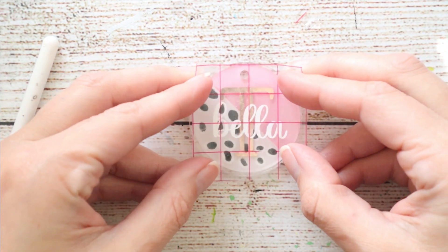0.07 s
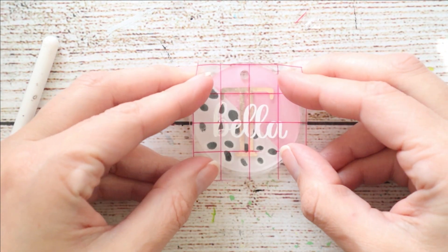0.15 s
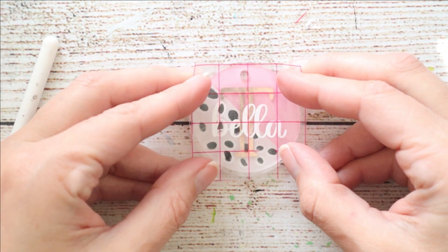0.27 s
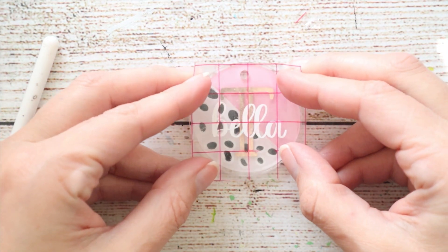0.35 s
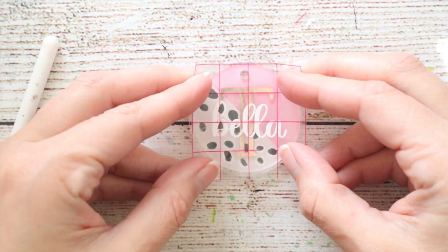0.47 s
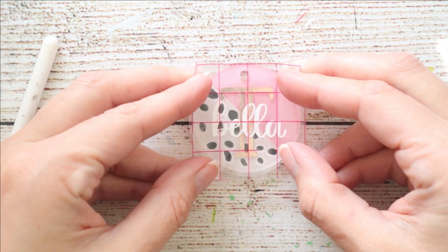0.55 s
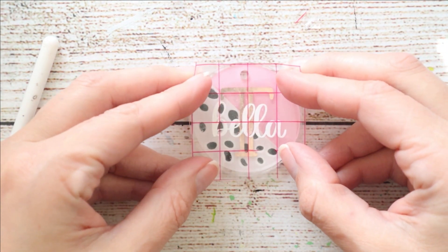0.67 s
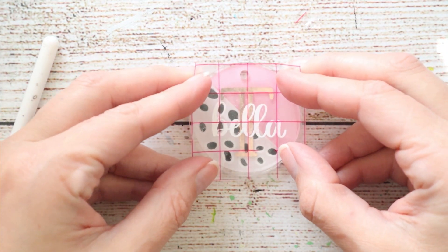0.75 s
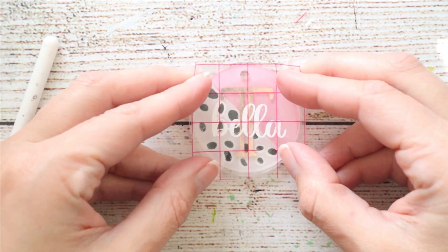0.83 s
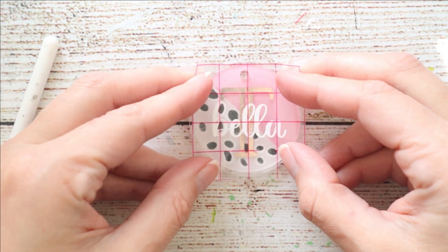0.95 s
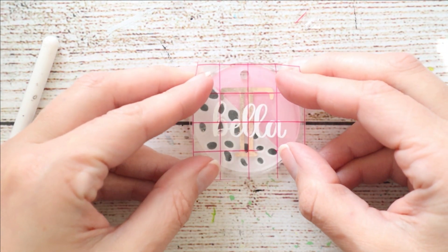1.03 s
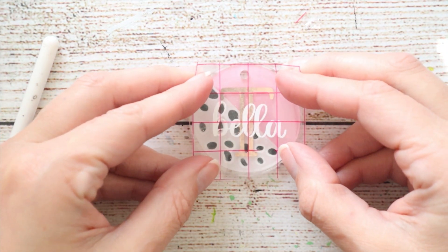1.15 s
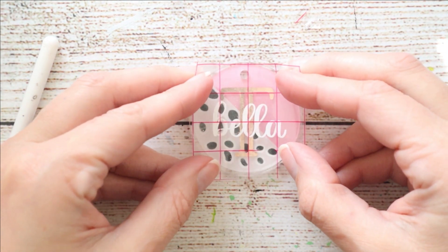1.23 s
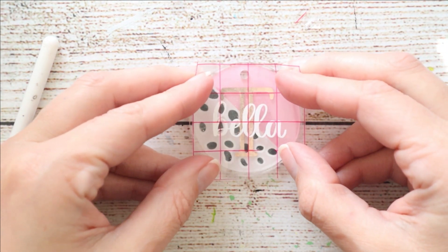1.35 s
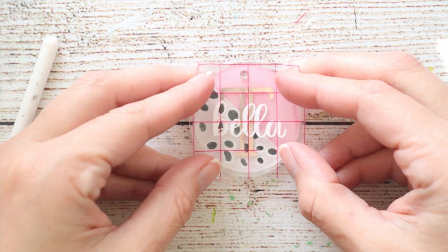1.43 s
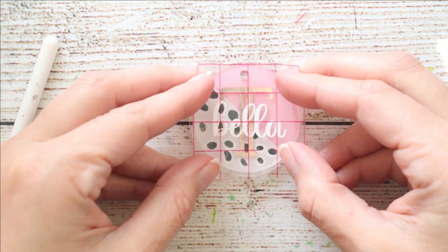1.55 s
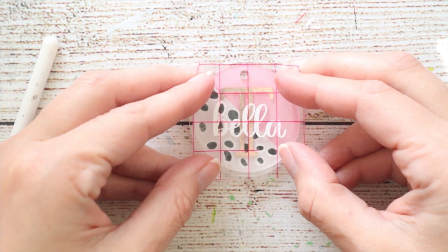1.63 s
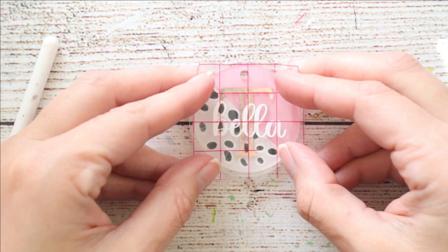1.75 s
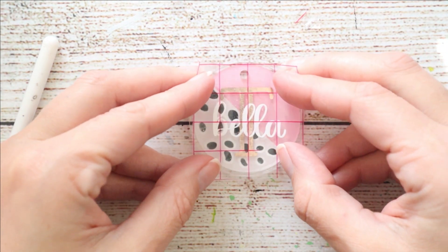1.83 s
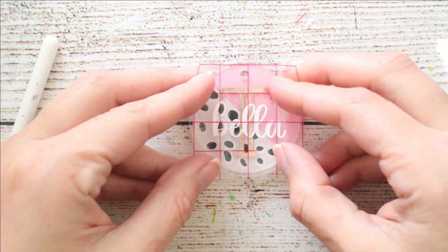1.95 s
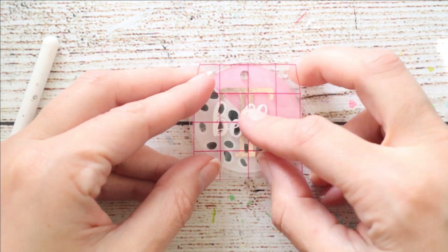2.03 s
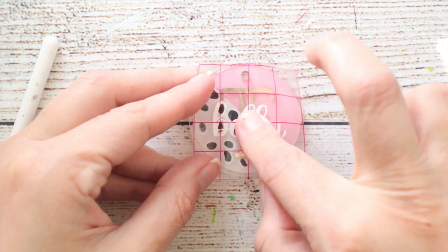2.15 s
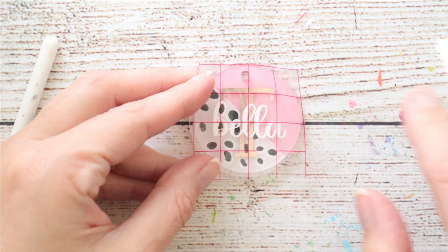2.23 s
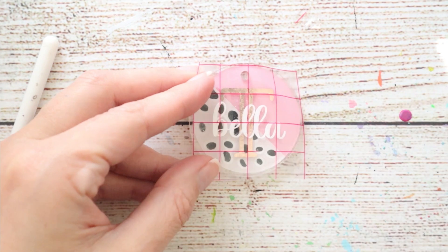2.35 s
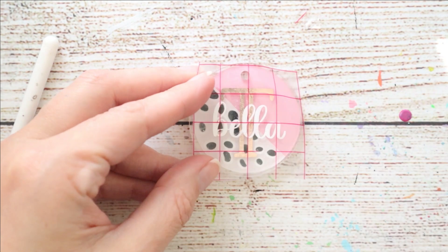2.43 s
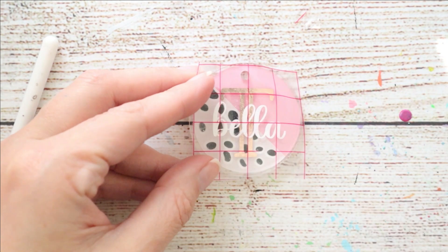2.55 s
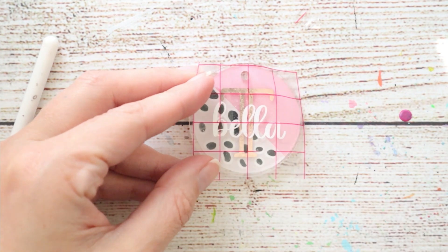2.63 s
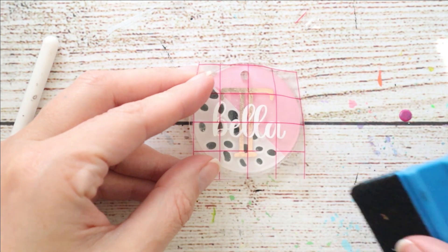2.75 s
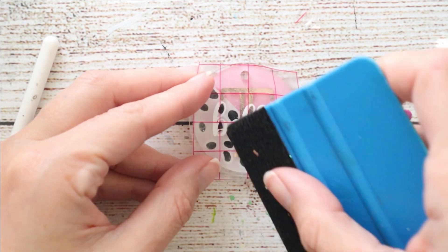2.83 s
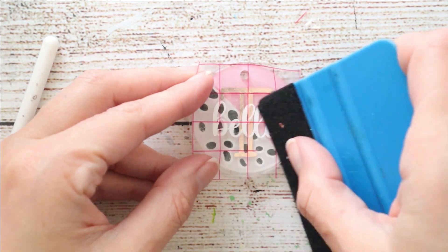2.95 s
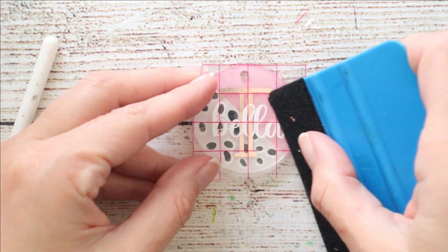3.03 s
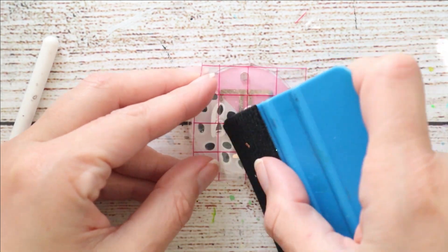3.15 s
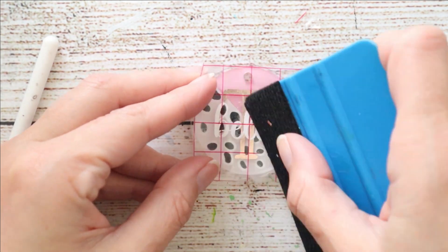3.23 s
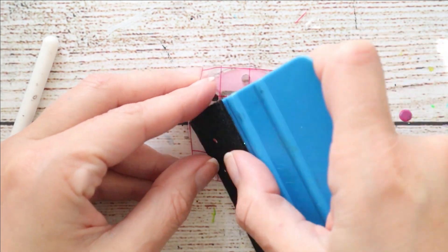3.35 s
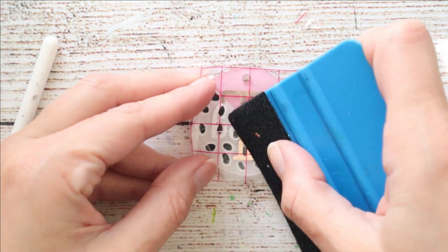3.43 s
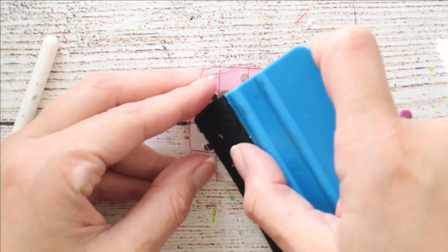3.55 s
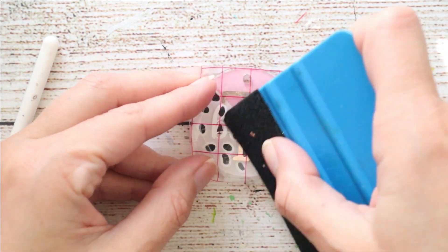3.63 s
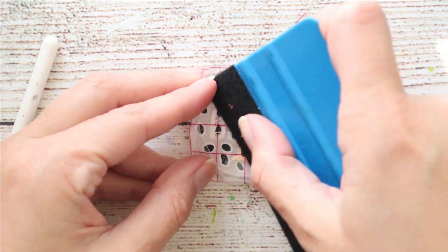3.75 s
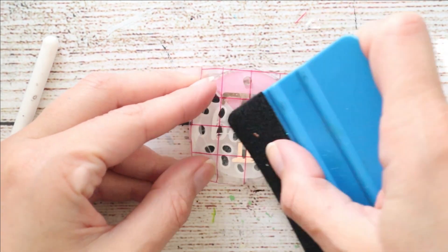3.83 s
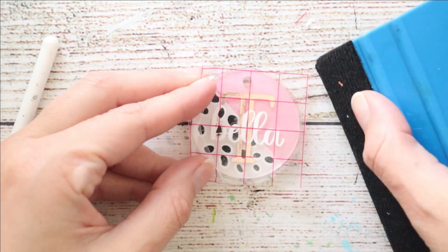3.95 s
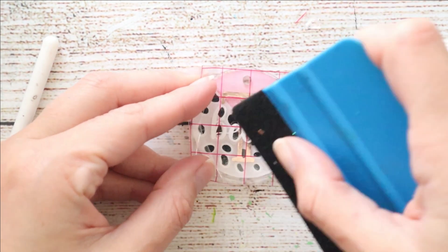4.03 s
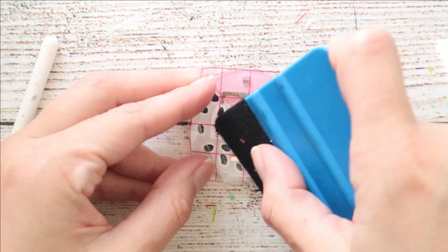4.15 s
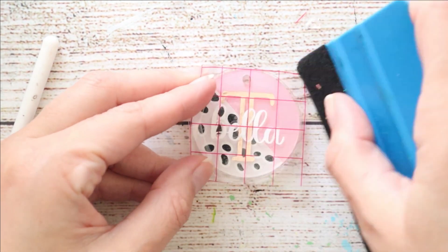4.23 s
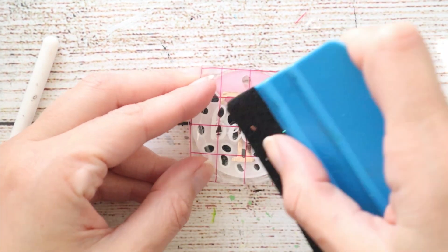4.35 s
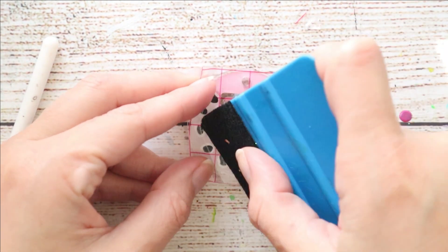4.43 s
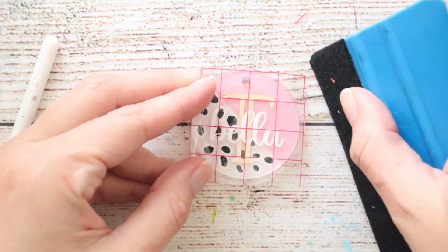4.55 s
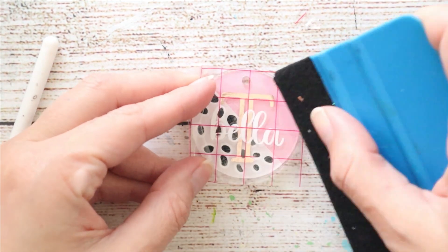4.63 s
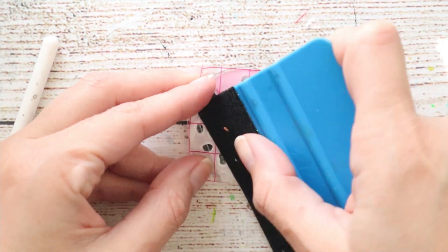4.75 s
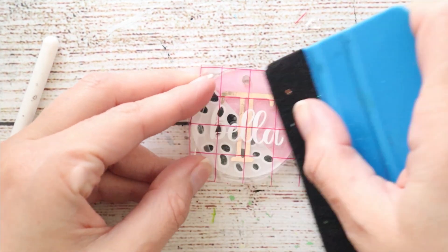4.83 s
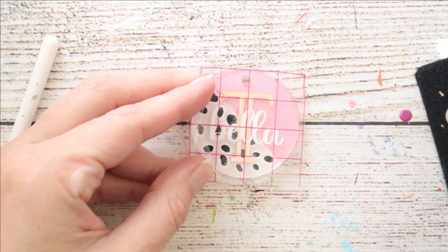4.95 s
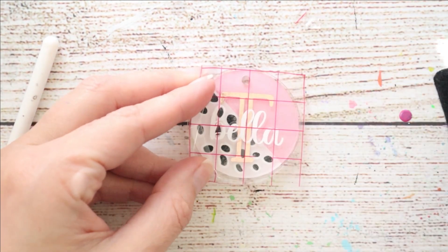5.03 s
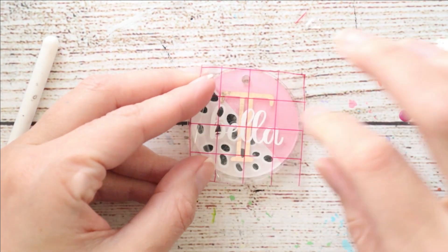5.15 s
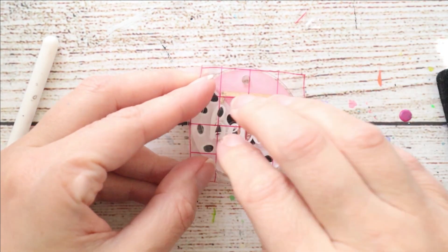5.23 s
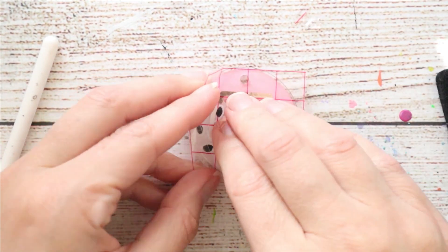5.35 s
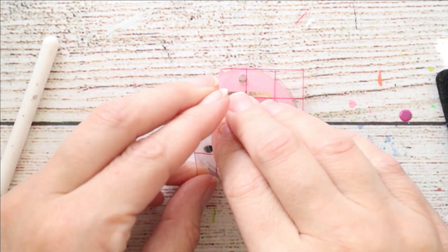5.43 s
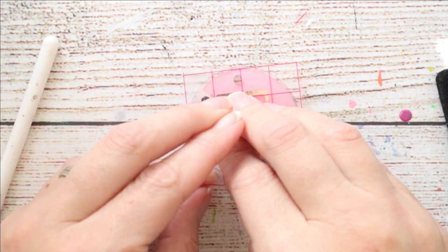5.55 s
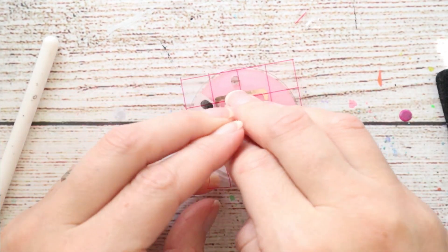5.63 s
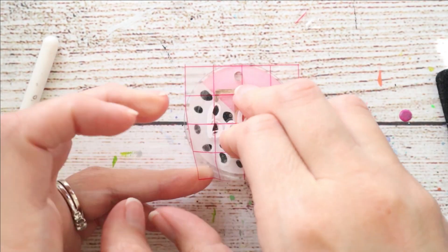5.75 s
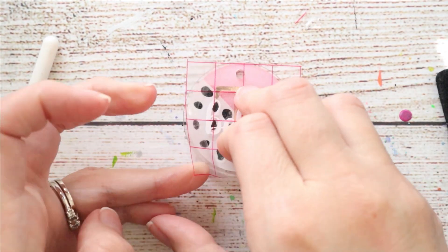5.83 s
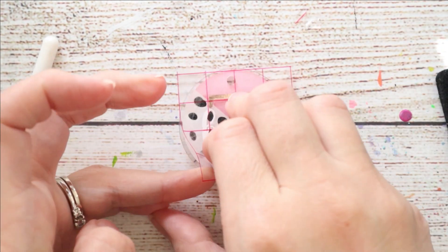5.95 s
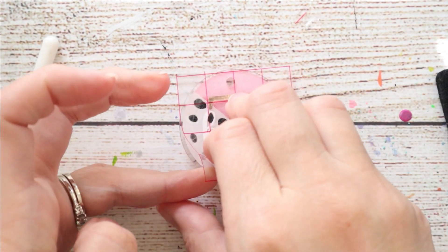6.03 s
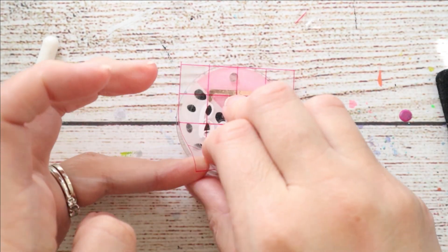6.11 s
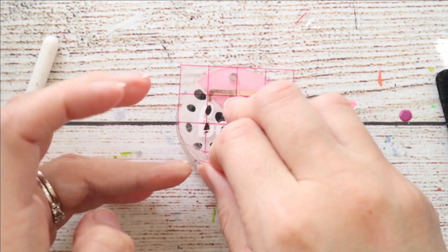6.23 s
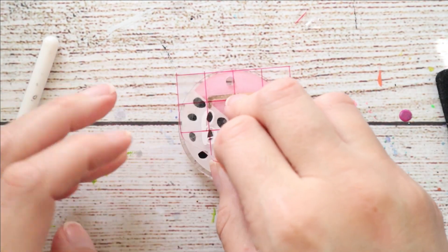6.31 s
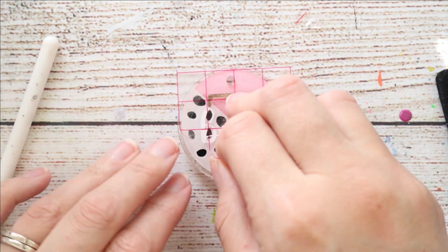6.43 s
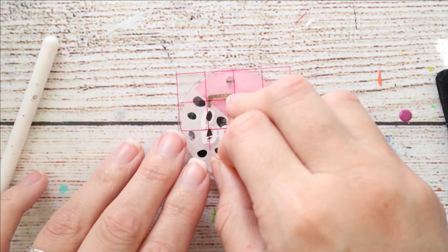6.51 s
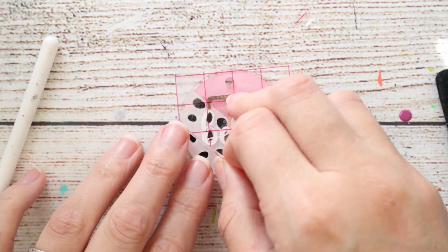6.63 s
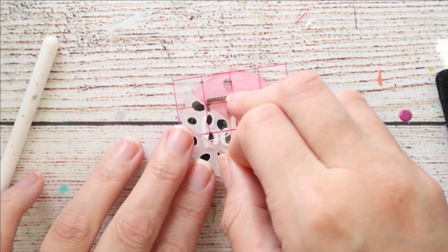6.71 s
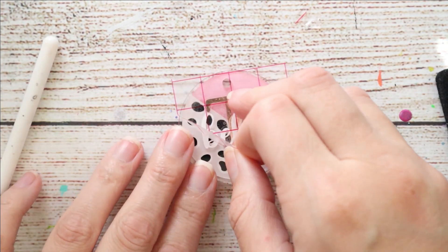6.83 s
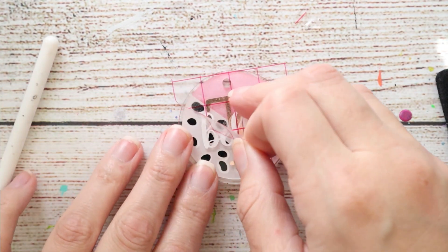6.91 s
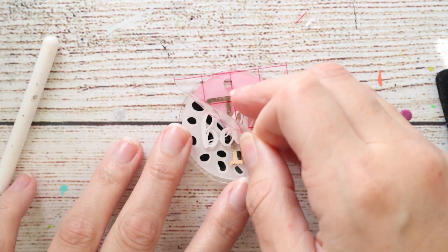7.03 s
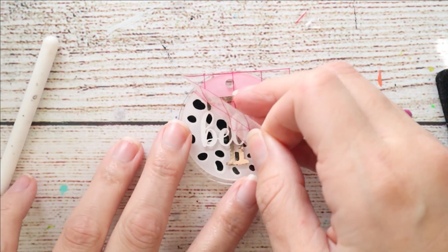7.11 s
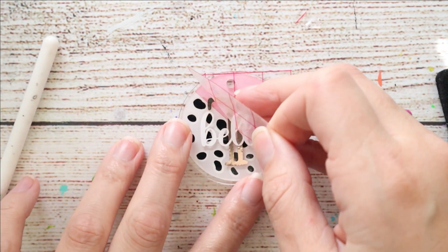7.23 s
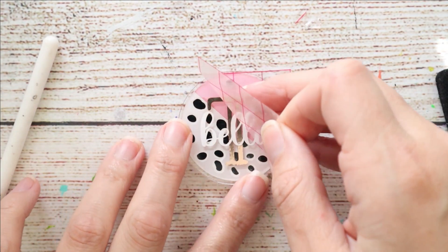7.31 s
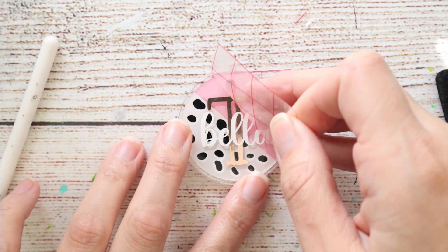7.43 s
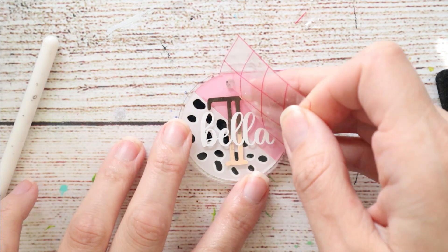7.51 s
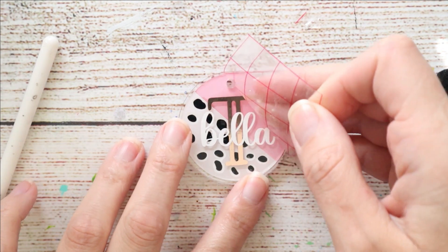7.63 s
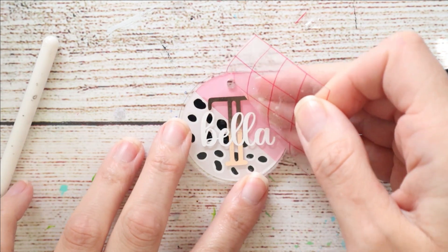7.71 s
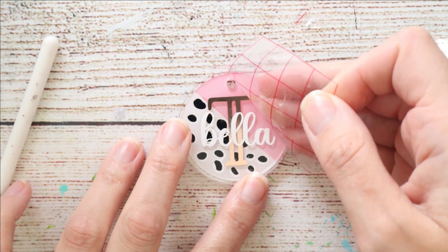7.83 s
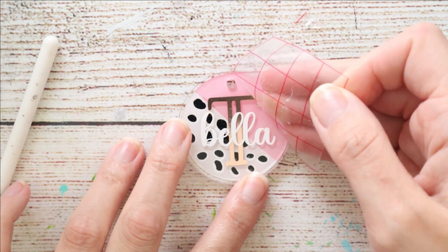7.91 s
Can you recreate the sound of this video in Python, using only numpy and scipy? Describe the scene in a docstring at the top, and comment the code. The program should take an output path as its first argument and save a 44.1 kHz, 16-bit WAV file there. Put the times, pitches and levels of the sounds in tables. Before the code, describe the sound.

A close stereo microphone in a small, quiet room picks up soft, steady, low air. Nothing else happens until about 2.0 s, when faint film ticks and a short scrape lead to a sharp, ringing snap at 2.2 s. Light disc bumps and scuffs follow, with a firmer thud near 2.5 s and a dull boom at 3.0 s. From 3.0 to 4.0 s felt rubs steadily over tape, hissy and grainy above a low drag, with small clicks. Between 4.2 and 5.4 s come the loudest hollow plastic-on-wood clacks, in an uneven run with brief scrapes. Around 5.4 to 6.0 s only small ticks and soft hand movement remain. At 6.1 s the disc gives a short stuttering judder; at 6.3 s a bright snap. From 6.7 s to the end, quiet fine crackling swells and dips as tape peels off, its bright rustle gliding slightly upward, then falling.

```python
"""Transfer tape is rubbed onto an acrylic disc with a felt-edged squeegee, then peeled off, heard close up.
Felt and fingers scrape (coloured random grains), and the disc clacks on a hollow craft table (dying modes).
The tape snaps (short ringing bursts), the pressed disc judders once along the table (stick and slip),
and the glue lets go in a fine crackle (random grains). A small, quiet room adds its echo and steady air."""
import sys
import numpy as np
from scipy import signal
from scipy.fft import rfft, irfft, next_fast_len
from scipy.io import wavfile
from scipy.ndimage import uniform_filter1d, map_coordinates

SR = 44100
rng = np.random.default_rng(int(sys.argv[2]) if len(sys.argv) > 2 else 0)


def waveform_to_disk(signal):
    """Save audio, clipped to [-1, 1], as 16-bit WAV at the path in sys.argv[1]."""
    frames = np.transpose(np.atleast_2d(signal))
    scaled = np.clip(frames, -1, 1) * 32767
    samples = np.round(scaled).astype(np.int16)
    wavfile.write(sys.argv[1], SR, samples)


N = 351473
TIME = np.arange(N) / SR
AGE = np.arange(SR // 3) / SR  # seconds since a blow
BLOW_S = 0.02  # a blow's level is its energy spread over this time
EDGE_HZ = 16300  # upper limit of the sound
ATTACK_S, RELEASE_DB_PER_S = 0.029, 185  # how strokes and shifting hands start and stop

# blows of the disc on the table: start_s, strength_db, hardness_db (clack over boom),
# weight_db (thud over boom), clack_hz (centre of the clack), tick_db (contact tick), tilt_db_per_octave (boom)
KNOCKS = [(2.1204, -36, -14, -5, 1500, -40.5, 1), (2.232, -35.5, 3.5, 0, 1580, -42, 2),
          (2.5, -36, -2.5, 2.5, 1790, -54, 0), (2.517, -25, -8, -3, 1460, -66, 0),
          (2.595, -39.5, -10, -6, 1800, -50, 1), (2.82, -45, -15.5, 1, 1400, -75, 6),
          (3.0035, -24.5, -17, -8, 1190, -67, -5.5), (3.182, -46.5, 2.5, 6, 2090, -56, -3),
          (3.3715, -49, 7, 2, 2010, -62, 7), (3.4211, -46.5, 3, 5.5, 2000, -57, -1),
          (3.632, -40, -16, -5, 1100, -72, 4), (3.661, -52, 3.5, 0, 2430, -69, -1.5),
          (3.731, -42.5, -27, 1.5, 1700, -66, -8), (3.837, -41.5, -20, 7, 1900, -51.5, -3.5),
          (3.869, -45, -4, 8, 2100, -60, -10), (4.028, -30, -18.5, -1.5, 1900, -37.5, -4.5),
          (4.218, -16.5, -2.5, -14, 1600, -49, 3.5), (4.329, -17.5, -12, -1.5, 1160, -30.5, -0.5),
          (4.509, -17, 1, -13, 1820, -16.5, 9), (4.6315, -22.5, -6, -2, 1730, -37.5, 2),
          (4.827, -22, 1, -6, 1680, -23.5, -2.5), (4.9472, -20.5, -6, -2, 1450, -30, 0.5),
          (5.2069, -18.5, 4, -11.5, 2950, -31.5, -5.5), (5.267, -30.5, -6.5, -22, 2480, -66, 1),
          (5.2768, -24, -19, -14, 1270, -63, 2), (5.3249, -36, -7.5, -22, 2500, -70, -5),
          (5.3695, -32, -8.5, -17, 1400, -65, -4), (5.7382, -35, -8.5, -8.5, 1600, -72, 1),
          (6.313, -42.5, -16, 7.5, 1900, -60, -7)]
# snaps of the tape: start_s, crack_db, ring_hz, brightness_db (fizz over crack)
SNAPS = [(2.0053, -57, 3870, -2), (2.063, -57.5, 4500, 1), (2.1205, -41.5, 2660, 5), (2.1765, -43, 7000, 9),
         (2.1796, -37, 4780, 0), (2.185, -36, 4470, 1), (2.2157, -43.5, 5000, 9), (2.2328, -20.5, 4140, -3),
         (3.1056, -37.5, 2900, -12), (3.182, -38, 3000, -9), (3.273, -44, 4800, -8),
         (3.2803, -39.5, 6260, 1), (3.2825, -32.5, 6340, 1.5), (3.3715, -38, 2900, -13),
         (3.385, -44, 4200, -6), (3.4214, -33, 3530, -22), (3.43, -46, 5500, -1), (3.6617, -44, 3750, -27),
         (3.739, -48, 3160, -9), (3.863, -46, 4000, -19), (3.8676, -35.5, 3030, -13),
         (3.9386, -47, 7000, 14), (4.0, -44, 1970, -21), (4.043, -54, 5050, 3), (4.51, -34.5, 4600, 11),
         (4.832, -38, 1820, 12.5), (5.226, -34, 7140, -4), (5.36, -40.5, 5140, -12), (5.37, -36, 6640, -14),
         (5.4493, -37, 5830, -0.5), (5.5541, -50, 4500, -7), (5.5999, -47.5, 3500, -1.5),
         (6.3135, -20.5, 4800, -4), (6.806, -46.5, 5930, 0), (7.5194, -48.5, 6900, -6),
         (7.7945, -53.5, 5860, -15), (7.838, -59, 6000, -15), (7.877, -53, 5630, -18)]
# colour of felt hissing on tape, also of the taut span: pitch_hz, level_db (relative, per Hz)
HISS = [(1500, -36.5), (3200, -2), (5000, 1), (7000, -0.5), (9000, -2), (12000, 2), (13500, -11.5),
        (15500, -35)]
# colour of low rumble through the table: pitch_hz, level_db (relative, per Hz)
DRAG = [(25, -18.5), (60, -3), (120, 1.5), (180, -7), (280, 2.5), (450, -13.5), (650, -13.5), (1200, -28),
        (3000, -41)]
# how alike left and right are for near sounds: pitch_hz, likeness (-1 opposite to 1 the same)
NEAR = [(100, 1), (300, 1), (600, 0.85), (1100, 0.37), (2200, 0.58), (5000, -0.14), (8000, 0.18),
        (12000, -0.36)]
# how alike left and right are for the room: pitch_hz, likeness (-1 opposite to 1 the same)
FAR = [(60, 1), (130, 0.49), (280, 0.02), (600, -0.31), (1300, -0.47), (6000, -0.68), (13000, -0.76)]


def amp(db):
    """Turns decibels into a gain."""
    return 10 ** (np.asarray(db) / 20)


def evened(x):
    """Scales a sound to an rms of one."""
    return x / np.sqrt(np.mean(x ** 2) + 1e-20)


def sized(x, db):
    """Scales a short stereo sound to a blow's level."""
    return amp(db) * x / np.sqrt(np.sum(x ** 2) / (2 * BLOW_S * SR) + 1e-20)


def read(points, hz):
    """Reads a table between its points, on a log-frequency axis."""
    f, value = np.transpose(points)
    return np.interp(np.log(hz + 1), np.log(f + 1), value)


def add(mix, s, sound):
    """Adds a stereo sound at time s, cut off at the end of the mix."""
    part = mix[:, round(s * SR):][:, :sound.shape[1]]
    part += sound[:, :part.shape[1]]


def colour(x, shape, likeness, ring_hz=1000., ring_db=0., ring_octaves=0.88):
    """Filters two unrelated signals to a colour, with one optional resonance, and blends them into stereo."""
    n = next_fast_len(x.shape[1] + 2048)
    hz = abs(np.fft.fftfreq(n, 1 / SR))
    db = read(shape, hz) + ring_db / (1 + (np.log2((hz + 1) / ring_hz) / ring_octaves) ** 2)
    db -= 18 * np.log2(np.maximum(hz / shape[-1][0], 1))  # the treble keeps falling past the last point
    # minimum phase: the filter never sounds before its input
    response = np.exp(np.conj(signal.hilbert(np.log(amp(db)))))[:n // 2 + 1]
    same = np.clip(read(likeness, hz[:n // 2 + 1]), -1, 1)
    mid, side = rfft(x, n) * response * np.sqrt([1 + same, 1 - same])
    return irfft(np.array([mid + side, mid - side]), n)[:, :x.shape[1]]


def burst(decay_s, rise_s=.0001, first=0.):
    """A brief chatter of micro-contacts, led by one sharp break of relative size first."""
    chatter = rng.standard_normal((2, len(AGE))) * np.exp(-AGE / decay_s)
    chatter *= 1 - np.exp(-AGE / rise_s)
    sign = np.sign(chatter[:, 1:2])
    return chatter + first * np.linalg.norm(chatter[0]) * sign * (AGE == 0)


def ring(modes, detune=.03, uneven_db=1.0, centre_hz=1000., focus_db=0.):
    """Dying modes, weaker by focus_db for each octave from centre_hz; weight and pitch vary with each blow."""
    hz, db, t60 = np.transpose(modes)[:, :, None]
    pitch, weight, polarity, lead = rng.standard_normal((4, len(hz), 1))
    mode_db = db + uneven_db * weight - focus_db * abs(np.log2(hz / centre_hz))
    gain = amp(mode_db - 60 * AGE / t60) * np.sign(polarity)
    turn = 2 * np.pi * hz * (1 + detune * pitch) * AGE
    # half the phase between left and right
    apart = np.sign(lead) * np.arccos(np.clip(read(NEAR, hz), -1, 1)) / 2
    stereo = np.array([(gain * np.sin(turn + k * apart)).sum(0) for k in (1, -1)])
    return stereo * (1 - np.exp(-AGE / 0.00056))


def gesture(start, length, swell_db, attack_s, release_db_per_s):
    """Gain of one movement: attack, a hold that swells or sags, release."""
    t = np.maximum(TIME - start, 0)
    swell = swell_db * (np.minimum(t / length, 1) - .5)
    release = release_db_per_s * np.maximum(t - length, 0)
    return np.minimum(t / attack_s, 1) * amp(swell - release)


def grains(per_s, spread_db, clump_db, clump_s):
    """Tiny slips or breaks of uneven size, arriving in clumps."""
    size = amp(spread_db * np.minimum(rng.exponential(1, N), 5))
    size *= rng.random(N) < per_s / SR
    clumps = np.interp(TIME / clump_s, np.arange(N), rng.standard_normal(N))
    return size * amp(clump_db * clumps) * rng.standard_normal((2, N))


def wandering(x, depth_db, patch_s, patch_hz):
    """The colour shifts in patches of time and pitch as the contact moves over the film."""
    hz, t, z = signal.stft(x, SR, nperseg=256)
    places = np.meshgrid(hz / patch_hz, t / patch_s, indexing="ij")
    shifts = map_coordinates(rng.standard_normal((len(hz), len(t))), places, order=1)
    return signal.istft(z * evened(amp(depth_db * shifts)), SR, nperseg=256)[1][:, :N]


def film(x):
    """The stiff tape adds its own resonances to whatever shakes it."""
    # what the film rings with: pitch_hz, width_hz, level_db (over the plain sound)
    film_rings = [(3635, 220, -1), (4650, 2700, -6), (5810, 190, -14), (6700, 1200, -11), (7750, 490, -10),
                  (10200, 490, -5), (11500, 310, -10)]
    ringing = 0
    for hz, width, db in film_rings:
        ringing = ringing + amp(db) * signal.lfilter(*signal.iirpeak(hz, hz / width, SR), x)
    return x + ringing


def board(db, tilt_db=0., dull_db=-5.0, dull_s=0.0066):
    """The table top's modes, tilted upward by tilt_db an octave, with the dull push of the blow itself."""
    # the table top: pitch_hz, level_db (relative), t60_s (time to die by 60 dB)
    board_modes = [(197, -13.5, 0.21), (240.4, -1, 0.15), (305.4, 1.5, 0.092), (337, 0.5, 0.073),
                   (388.6, -7.5, 0.1), (568, -2.5, 0.062), (675, -2.5, 0.029), (830, -11.5, 0.01)]
    # colour of the push: pitch_hz, level_db (relative, per Hz)
    push_colour = [(30, -21), (90, -13.5), (280, 5.5), (480, -17), (700, -6), (1200, -16.5), (3000, -42)]
    push = colour(burst(dull_s), push_colour, NEAR)
    modes = ring(board_modes, detune=0.022, centre_hz=board_modes[-1][0], focus_db=tilt_db)
    return sized(sized(modes, 0) + sized(push, dull_db), db)


def air():
    """Steady room tone: coloured noise, wide above the bass."""
    # colour of the tone: pitch_hz, level_db (relative, per Hz)
    air_colour = [(12, -37.5), (20, -2.5), (22, 1.5), (43, -1), (80, 0.5), (102, -2.5), (272, -2),
                  (329, -5.5), (420, -7.5), (567, -9.5), (977, -12.5), (1350, -15), (3230, -23),
                  (12200, -40.5), (13300, -58)]
    hz, db = np.transpose(air_colour)
    width_db = -10 * np.log10(np.clip(1 + read(FAR, hz), .1, 2))  # makes up for what a mono mix cancels
    shape = [*zip(hz, db + width_db), (EDGE_HZ, -75)]
    tone = colour(rng.standard_normal((2, N)), shape, FAR)
    return amp(-53) * tone / tone.mean(0).std()  # dB, of left and right averaged


def dying(times, db, db_per_s):
    """A gain that jumps at each event and fades steadily."""
    jumps = np.bincount(np.round(times * SR).astype(int), amp(db), minlength=N)[:N]
    return signal.lfilter([1], [1, -amp(-db_per_s / SR)], jumps)


def friction():
    """Gains of hiss, rasp and drag: strokes, the disc sliding on after a knock, film settling after a snap."""
    # strokes of felt or a fingertip, levels before the trims in sliding():
    # start_s, length_s, hiss_db, rasp_db, drag_db (on the table), swell_db (from start to end)
    strokes = [(1.982, 0.2, -53, -58.5, -62, 26), (2.356, .06, -55, -51, -43, -14),
               (2.483, 0.11, -52, -52.5, -51, 24.5), (2.651, .13, -50.5, -53, -46, 3.5),
               (3.021, 1, -52, -52.5, -46.5, -2.5), (4.259, 0.057, -44, -43.5, -40, 5),
               (4.863, 0.1, -50, -49.5, -46, 3), (4.935, 0.15, -44.5, -45.5, -40.5, -14),
               (5.284, 0.071, -66, -46, -33.5, -4.5), (5.405, 0.13, -51.5, -54.5, -63, 6),
               (5.744, 0.14, -61.5, -61, -64, -2.5), (5.955, .11, -63, -65.5, -54.5, 2),
               (6.094, 0.1, -50, -57, -62, -6.5), (6.228, 0.1, -54, -57, -49, -7)]
    settle_db, settle_db_per_s = -30, 47  # snapped film rustles, against its crack
    shift_rasp_db, shift_drag_db, shift_db_per_s = -27.5, -19, 93  # sliding on, against clack and boom
    knock_s, knock_db, hard_db = np.transpose(KNOCKS)[:3]
    snap_s, snap_db = np.transpose(SNAPS)[:2]
    settle = dying(snap_s, snap_db + settle_db, settle_db_per_s)
    shift_rasp = dying(knock_s, knock_db + hard_db + shift_rasp_db, shift_db_per_s)
    shift_drag = dying(knock_s, knock_db + shift_drag_db, shift_db_per_s)
    power = np.array([settle, shift_rasp, shift_drag]) ** 2
    for start, length, *layers_db, swell_db in strokes:
        movement = gesture(start, length, swell_db, ATTACK_S, RELEASE_DB_PER_S)
        power += np.outer(amp(layers_db), movement) ** 2
    return np.sqrt(power)


def sliding(hiss_db=-1.5, rasp_db=0., drag_db=-0.5):
    """Felt and skin catch on the tape in tiny slips; a low layer of slips shakes the table."""
    # colour of the coarser slips: pitch_hz, level_db (relative, per Hz)
    rasp_colour = [(400, -18), (900, -3), (1900, 1.5), (3000, -5.5), (4500, -11.5), (8000, -31.5)]
    hiss, rasp, drag = friction()
    fine = film(colour(grains(per_s=8400, spread_db=-1.0, clump_db=3.0, clump_s=0.023), HISS, NEAR))
    coarse = colour(grains(per_s=2500, spread_db=2.0, clump_db=3.5, clump_s=0.012), rasp_colour, NEAR)
    low = colour(grains(per_s=2500, spread_db=1.3, clump_db=1.3, clump_s=.025), DRAG, NEAR)
    scrape = amp(hiss_db) * hiss * evened(fine) + amp(rasp_db) * rasp * evened(coarse)
    scrape = wandering(scrape, depth_db=3, patch_s=.04, patch_hz=600)
    return scrape + amp(drag_db) * drag * evened(low)


def above(x, edge_hz):
    """A small patch of film radiates little below its own note."""
    return signal.sosfilt(signal.butter(3, min(edge_hz, SR / 4), "high", fs=SR, output="sos"), x)


def rebound(x, crossing_s=0.0007, share=0.43):
    """A snap runs across the film and comes back from its edge, a different distance each time."""
    delay_s = crossing_s * 2 ** rng.uniform(-.5, 0.55)
    return x + share * np.roll(x, round(delay_s * SR), axis=1)


def snaps(crack_s=0.0015, fizz_s=0.0023, scatter_db=-1.5, edge_share=0.59):
    """The stiff film buckles or unsticks: a ringing crack, a bright fizz and a nudge to the table."""
    # colours of crack and fizz: pitch_hz, level_db (relative, per Hz)
    crack_colour = [(500, -36), (1500, -3.5), (2500, -1.5), (3500, 1), (6500, -4), (8500, -3.5),
                    (13000, -19)]
    fizz_colour = [(4000, -13.5), (7000, -3.5), (9000, 0), (11600, 5.5), (13300, -2), (16000, -29.5)]
    push_db = -15.5  # the nudge, against the crack
    direct, scattered = np.zeros((2, 2, N))
    for s, db, ring_hz, bright_db in SNAPS:
        edge_hz = edge_share * ring_hz
        crack = colour(burst(crack_s, first=0.72), crack_colour, NEAR,
                       ring_hz=ring_hz, ring_db=9.5, ring_octaves=.55)
        crack = rebound(film(above(crack, edge_hz)))
        fizz = colour(burst(fizz_s, first=0.87), fizz_colour, NEAR)
        bright = sized(rebound(film(fizz)), db + bright_db)
        add(direct, s, sized(crack, db) + bright + board(db + push_db))
        # the walls get a plainer mix of all directions
        plain = colour(burst(crack_s, first=2.9), crack_colour, NEAR,
                       ring_hz=ring_hz, ring_db=6.0, ring_octaves=.7)
        add(scattered, s, sized(above(plain, edge_hz), db) + sized(fizz, db + bright_db))
    return direct, amp(scatter_db) * scattered


def knocks(chatter_db=0.0, chatter_s=0.0027, tick_s=0.0024):
    """Squeegee and fingers tip the disc against the table: tick, clack of the disc, thud and boom of the table."""
    # the table's lowest modes and the disc's modes: pitch_hz, level_db (relative), t60_s (time to die by 60 dB)
    thud_modes = [(53.8, -4, 0.35), (75, -6.5, 0.16), (107.3, 6, 0.093), (136.4, 0, 0.24)]
    disc_modes = [(1072, 2.5, 0.059), (1395, -4, 0.043), (1447, -5, 0.022), (1670, -2.5, 0.047),
                  (1630, 5, 0.0065), (2020, 5.5, 0.03), (2570, 3, 0.025), (2916, 7, 0.01)]
    # colours of the disc's chatter and the contact tick: pitch_hz, level_db (relative, per Hz)
    chatter_colour = [(400, -3.5), (900, 2.5), (1900, 0.5), (3000, -6), (3600, -12), (6000, -10),
                      (10000, -32)]
    tick_colour = [(900, -27), (2800, -1), (4500, -1), (7000, -4.5), (9000, -1.5), (11500, 5), (13500, -16),
                   (16000, -35)]
    out = np.zeros((2, N))
    for s, db, hard_db, weight_db, clack_hz, tick_db, tilt_db in KNOCKS:
        chatter = colour(burst(chatter_s, rise_s=.003), chatter_colour, NEAR,
                         ring_hz=clack_hz, ring_db=8, ring_octaves=.5)
        disc = ring(disc_modes, detune=0.013, centre_hz=clack_hz, focus_db=16.0)
        clack = sized(disc, 0) + sized(chatter, chatter_db)
        tick = sized(colour(burst(tick_s, rise_s=0.00025), tick_colour, NEAR), tick_db)
        thud = sized(ring(thud_modes, detune=0.043), db + weight_db)
        add(out, s, thud + board(db, tilt_db) + sized(clack, db + hard_db) + tick)
    return out


def scuffs(rise_s=0.0024, catch_db=1.5, catch_s=0.0076):
    """A fingertip or the squeegee's edge skids briefly, its grip varying every few milliseconds as it dies."""
    # short skids: start_s, level_db, centre_hz, decay_s
    skids = [(2.262, -41, 704, 0.05), (2.373, -39.5, 1970, 0.06), (2.434, -49.5, 2340, 0.012),
             (2.52, -35, 846, 0.074), (2.592, -41.5, 2800, 0.012), (2.748, -45, 2030, 0.031),
             (2.785, -37.5, 2900, 0.0093), (2.951, -49, 1670, 0.0026), (2.965, -54, 1500, 0.0034),
             (3.005, -40.5, 1140, 0.028), (4.232, -27.5, 1360, 0.063), (4.85, -30, 1465, 0.04),
             (5.213, -37.5, 2900, 0.03), (5.28, -36.5, 447, 0.078), (5.507, -35, 4530, 0.0067),
             (6.112, -45, 3990, 0.0055), (6.325, -40, 4500, 0.073), (6.849, -52, 2280, .04),
             (6.93, -56.5, 1600, .035), (7.515, -54, 2400, 0.011)]
    # colour of a skid: pitch_hz, level_db (relative, per Hz)
    skid_colour = [(200, 4.5), (600, 2.5), (1500, -1.5), (3000, -6.5), (4000, -10), (7000, -8.5),
                   (12000, -14.5), (15000, -39)]
    out = np.zeros((2, N))
    for s, db, centre_hz, decay_s in skids:
        grip = np.interp(AGE / catch_s, np.arange(len(AGE)), rng.standard_normal(len(AGE)))
        skid = colour(burst(decay_s, rise_s) * amp(catch_db * grip), skid_colour, NEAR,
                      ring_hz=centre_hz, ring_db=22.5, ring_octaves=1.0)
        add(out, s, sized(skid, db))
    return out


def hands():
    """Hands shift their weight on the table: soft low noise that swells or sags."""
    # shifts: start_s, length_s, level_db, swell_db (from start to end)
    shifts = [(5.084, 0.021, -39.5, 6), (5.961, 0.12, -50, 16), (6.957, 0.24, -54, -2),
              (7.81, 0.15, -49.5, 6)]
    weight = 0
    for start, length, db, swell_db in shifts:
        weight = weight + amp(db) * gesture(start, length, swell_db, ATTACK_S, RELEASE_DB_PER_S)
    return weight * evened(colour(rng.standard_normal((2, N)), DRAG, NEAR))


def judder(slip_hz=136.1, jitter=.45, harden=1.45):
    """The pressed disc breaks loose: uneven stick and slip rings the table; harder slips are brighter."""
    # what the judder rings: pitch_hz, width_hz, level_db (relative, at full force)
    judder_rings = [(270, 14, 3.5), (334, 25, 6.5), (572, 53, 0), (689, 20, -1.5), (1150, 30, -9.5),
                    (1690, 37, -16), (2170, 410, -30), (3600, 130, -15)]
    # pushed briefly, then coming to rest
    force = amp(-24) * gesture(6.099, 0.021, 0, attack_s=0.016, release_db_per_s=177)
    wander = evened(uniform_filter1d(rng.standard_normal(N), size=200))
    slip_count = np.floor(np.cumsum(slip_hz * np.exp(jitter * wander)) / SR)
    slips = np.diff(slip_count, prepend=0)  # one click for each slip
    out = np.zeros(N)
    for hz, width, db in judder_rings:
        mode = np.exp(-np.pi * width * AGE) * np.sin(2 * np.pi * hz * AGE)
        ringing = evened(signal.oaconvolve(slips, mode)[:N])
        brightness = (force / force.max()) ** (harden * np.log10(hz / judder_rings[0][0]))
        out += amp(db) * ringing * brightness
    out *= force
    return out * np.linalg.norm(force) / np.linalg.norm(out)


def resonate(x, hz, width_hz):
    """A resonance that follows the curve hz."""
    turn = np.exp(2j * np.pi * np.cumsum(hz) / SR)
    r = np.exp(-np.pi * width_hz / SR)
    # shift the note down to zero, smooth, and shift it back
    smooth = signal.lfilter([(1 - r) ** 2], [1, -2 * r, r * r], x / turn + 1e-18)
    return 2 * (turn * smooth).real


def peeling(glue_db=0.5, film_db=-0.5):
    """Threads of glue break by the thousand; the freed film rings and the taut span's note glides."""
    # tape lifting off the disc: start_s, crackle_db (before the trims glue_db and film_db), span_hz (taut span)
    peel = [(6.68, -63.5, 4500), (6.73, -56, 4600), (6.97, -52, 4700), (7.28, -57.5, 5340),
            (7.36, -51, 5600), (7.45, -57, 5300), (7.53, -48.5, 6700), (7.63, -51, 7650),
            (7.76, -62.5, 5940), (7.98, -53, 3940)]
    # colours of breaking glue and freed film: pitch_hz, level_db (relative, per Hz)
    glue_colour = [(600, -34), (2000, -2), (3300, -7.5), (4600, -5), (6000, -10.5), (9200, 0.5),
                   (12000, 2.5), (13500, -5.5), (15500, -28)]
    film_colour = [(3000, -20), (4800, -7), (5800, 1.5), (7700, 0.5), (9000, 0), (13000, -30)]
    freed_db, freed_db_per_s = -11, 8  # the film rings more, against the crackle, as more comes free
    span_db, span_width_hz = -9.5, 2600  # the span's note, against the crackle
    peel_s, crackle_db, span_hz = np.transpose(peel)
    crackle = amp(np.interp(TIME, peel_s, crackle_db, left=-200, right=-200))  # silent outside the peel
    freed = crackle * amp(freed_db + freed_db_per_s * (TIME - peel_s[0]))
    breaks = film(grains(per_s=3500, spread_db=1.2, clump_db=1.2, clump_s=.02))
    note_hz = np.interp(TIME, peel_s, span_hz)
    span = amp(span_db) * evened(resonate(colour(breaks, HISS, NEAR), note_hz, span_width_hz))
    glue = amp(glue_db) * evened(colour(breaks, glue_colour, NEAR))
    loose = amp(film_db) * freed * evened(colour(breaks, film_colour, NEAR))
    return wandering(crackle * (glue + span) + loose, depth_db=2.3, patch_s=.11, patch_hz=500)


def room(x, build_s=0.00037):
    """Near walls return a dense noise tail, each band dying at its own speed, driven by the left channel."""
    # colour of the tail: pitch_hz, level_db
    tail_colour = [(60, -33.5), (250, -20), (700, -3.5), (1700, -9), (4000, -9), (11000, -11.5),
                   (14000, -21)]
    # how fast the tail dies: pitch_hz, t60_s (time to die by 60 dB)
    tail_t60 = [(100, 0.12), (500, 0.28), (1600, 0.49), (5000, 0.29), (12000, 0.4)]
    hz, t, z = signal.stft(rng.standard_normal((2, SR // 2)), SR, nperseg=256)
    tail = signal.istft(z * amp(-60 * t / read(tail_t60, hz)[:, None]), SR, nperseg=256)[1]
    tail *= 1 - np.exp(-(np.arange(tail.shape[1]) / SR / build_s) ** 2)
    tail = colour(tail / np.linalg.norm(tail), tail_colour, FAR)
    return signal.fftconvolve(x[:1], tail, axes=1)[:, :N]


def scene():
    """Everything on the table, its echo and the room tone."""
    table = sliding() + knocks() + scuffs() + hands() + judder() + peeling()
    direct, scattered = snaps()
    return air() + table + direct + room(table + scattered)


def record(dry, low_cut_hz=44.4):
    """The microphone loses the deepest bass, peaks past full scale are clipped, then the treble is limited."""
    low_cut = signal.butter(2, low_cut_hz, "high", fs=SR, output="sos")
    clipped = np.clip(signal.sosfilt(low_cut, dry), -1, 1)
    band_limit = signal.firwin(255, EDGE_HZ, window=("kaiser", 9), fs=SR)
    return signal.oaconvolve(clipped, band_limit[None], "same")


dry = scene()
out = record(dry)
waveform_to_disk(out)
```